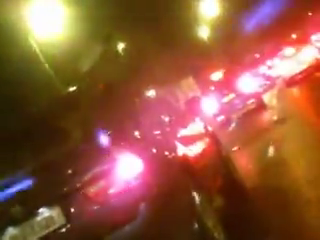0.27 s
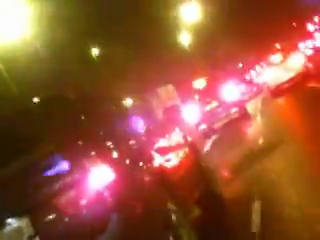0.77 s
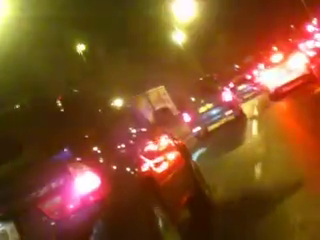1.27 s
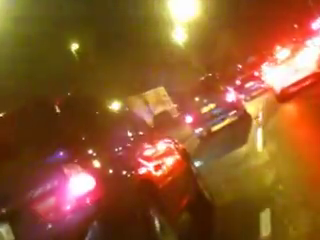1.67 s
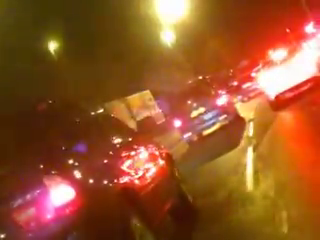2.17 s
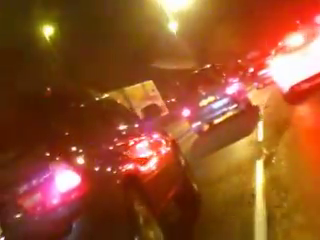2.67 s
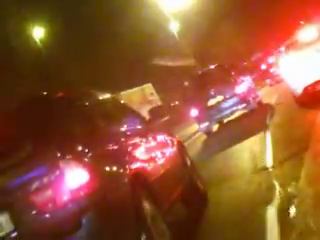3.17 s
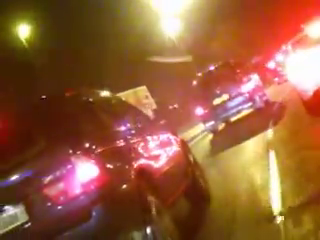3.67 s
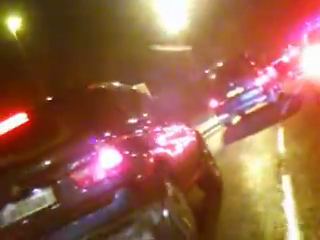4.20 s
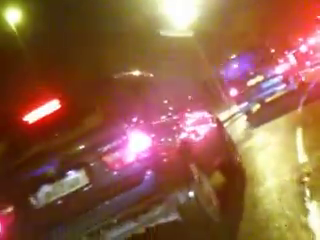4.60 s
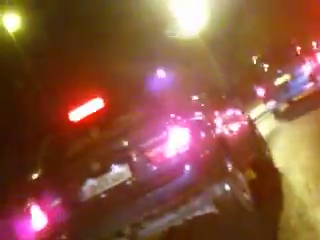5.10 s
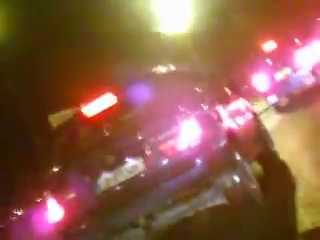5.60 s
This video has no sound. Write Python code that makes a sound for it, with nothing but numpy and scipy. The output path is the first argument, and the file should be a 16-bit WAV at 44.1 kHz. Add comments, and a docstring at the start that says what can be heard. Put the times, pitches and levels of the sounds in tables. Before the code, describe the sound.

A motorcycle rolls along with the throttle nearly closed, heard from a small onboard camera in a hollow housing, so the sound is narrow and boxy. The engine throbs and clatters throughout at a nearly even speed, with a ringing whirr over a low drone. At about 0.5 seconds the mount rattles and loud gusts hit the microphone, overloading it. From 1 second the wind becomes a rapid, thudding flutter with sharp slaps. At about 1.6 seconds it drops away, leaving the much quieter engine, light rattles and a few faint, dull knocks of bodywork between 2 and 4 seconds. Soft pulses of air return just after 4 seconds, followed by a few ringing rattles, the sharpest near 4.7 seconds. From 4.8 seconds heavy, distorted gusts batter the microphone in quick succession until the end, just before 6 seconds.

```python
"""A motorcycle rolls through night traffic, throttle nearly closed, heard by a small camera in a hollow
housing. From the start the engine throbs and clatters through the housing's resonances. Near half a
second the mount rattles and rings them too, while gusts and air pulses at crank rate drive the microphone
hard into overload. After a second and a half the wind drops, leaving the engine, light rattles and dull
knocks of bodywork. The air returns at four seconds and overloads the microphone again to the end."""
import sys
import numpy as np
from scipy import signal
from scipy.fft import rfft, irfft
from scipy.io import wavfile
from scipy.ndimage import uniform_filter1d

SR = 44100
rng = np.random.default_rng(int(sys.argv[2]) if len(sys.argv) > 2 else 0)


def bounce(signal):
    """Save signal as a 16-bit WAV file at the path given by the first command-line argument."""
    frames = np.transpose(np.atleast_2d(signal))
    limited = np.clip(frames, -1, 1)
    pcm = np.round(limited * 32767).astype(np.int16)
    wavfile.write(sys.argv[1], SR, pcm)


N = 257984
T = np.arange(N) / SR

# The colour of an eddy's fine turbulence. Each row: frequency in Hz, level in dB.
TURBULENCE_COLOUR = [(40, -0.5), (200, 12.5), (600, 9), (1100, 0), (1700, 4), (2300, -4.5), (4000, -15)]


def undb(db):
    """Decibels to gain."""
    return 10 ** (np.asarray(db) / 20)


def curve(rows):
    """An automation line through rows of time in seconds and value."""
    return np.interp(T, *np.transpose(rows))


def noise(colour):
    """Noise of rms 1, coloured by rows of frequency in Hz and level in dB."""
    hz, db = np.transpose(colour)
    bins_hz = np.maximum(np.arange(N // 2 + 1) * SR / N, 1)
    gain = undb(np.interp(np.log(bins_hz), np.log(hz), db))
    coloured = irfft(rfft(rng.standard_normal(N)) * gain, N)
    return coloured / coloured.std()


def drift(rate):
    """A modulator of spread 1 that glides to a new random value rate times a second."""
    hold = max(int(SR / rate), 2)
    glide = uniform_filter1d(rng.standard_normal(N)[np.arange(N) // hold], hold)
    return glide / glide.std()


def swells(rows, rise=1):
    """Bell curves. Each row: centre in seconds, gain, half-length in seconds. Rise under 1 hits harder."""
    envelope = np.zeros(N)
    for s, gain, width in rows:
        near = slice(*np.searchsorted(T, [s - 10 * width, s + 10 * width]))
        age = (T[near] - s) / width
        envelope[near] += gain * np.exp(-.5 * np.where(age < 0, age / rise, age) ** 2)
    return envelope


def moments(rate):
    """Sample positions of chance events, about rate a second."""
    at = (np.cumsum(rng.gamma(2, .5, size=600)) / rate * SR).astype(int)
    return at[at < N]


def ring(pitch_hz, wander, rate, flutter_db=3.5):
    """An unevenly driven resonance: a tone whose pitch and level stray rate times a second."""
    cycles = np.cumsum(pitch_hz * (1 + wander * drift(rate))) / SR
    return np.sqrt(2) * np.sin(2 * np.pi * cycles) * undb(flutter_db * drift(rate))


def engine(turns, lag_turns=0.22, firing_depth=.13, crank_depth=.14, warble=.016):
    """A four-stroke single: clatter swells once a turn, more every second turn as it fires over a drone."""
    # The colours of clatter in the housing and of the exhaust drone. Each row: frequency in Hz, level in dB.
    housing_colour = [(300, -52), (600, -29.5), (950, -17.5), (1100, -14), (1225, -4.5), (1350, -15),
                      (1530, 0), (1690, -4), (1860, -14.5), (2020, -7), (2350, -25.5), (2750, -29),
                      (3020, -21), (4200, -36.5)]
    drone_colour = [(25, -6), (60, -21.5), (105, -20.5), (135, -10), (175, -1), (215, 3.5), (270, -11.5),
                    (330, -1.5), (410, -9), (520, -26), (800, -48.5), (2000, -80)]
    # Faders for the clatter, the drone and the exhaust pipe's boom. Each row: time in seconds, level in dB.
    clatter_fader = [(0, -26), (.9, -28), (1.8, -29.5), (3.9, -29), (5.85, -27)]
    drone_fader = [(0, -30), (.4, -29), (.9, -31.5), (3, -32.5), (3.6, -34.5), (5.85, -30.5)]
    boom_fader = [(0, -25.5), (.4, -37.5), (.9, -31), (1.6, -43), (4.1, -48), (4.48, -34.5), (5.85, -46)]
    angle = 2 * np.pi * (turns - lag_turns)
    firing = np.cos(angle / 2)
    throb = 1 + firing_depth * firing + crank_depth * np.cos(angle)
    hiss = undb(-0.8) * noise(housing_colour)
    whine = undb(-4) * ring(pitch_hz=1683, wander=0.031, rate=70)  # the housing's main resonance
    # a swinging delay bends the pitch up and down with each firing
    delay_s = warble * np.cumsum(np.sin(angle / 2)) / SR
    whirr = np.interp(T - delay_s, T, hiss + whine)
    clatter = whirr * throb * undb(curve(clatter_fader) + 1.22 * drift(110))
    drone = noise(drone_colour) * (1 + .12 * firing) * undb(curve(drone_fader) + 1.2 * drift(25))
    boom = ring(pitch_hz=179.2, wander=0.089, rate=73) * undb(curve(boom_fader))
    return clatter + drone + boom


def mount_rattles(chatter_per_s=5.9, chatter_db=-29.5):
    """The mount rattles with a dry rasp and rings the housing; faint chatter fills the gaps."""
    # The mount's rattles. Each row: time in seconds, ring level in dB, half-length in seconds,
    # rasp against the ring in dB.
    hits = [(0.44, -17.5, 0.00082, 9.5), (1.032, -8.5, 0.0025, -9), (1.507, -15.5, .012, -6.5),
            (2.702, -23, 0.012, -3.5), (3.674, -21.5, .008, -17.5), (3.769, -23.5, 0.011, -24),
            (4.407, -25.5, 0.01, 2), (4.501, -16.5, 0.0033, -12), (4.712, -1.5, .0013, -5),
            (4.817, -13, 0.001, -3), (4.9, -24, 0.0069, -7)]
    # The colour of the dry rasp. Each row: frequency in Hz, level in dB.
    rasp_colour = [(200, -10), (700, -9.5), (1300, 2.5), (1900, 2.5), (2500, -15.5), (3200, -7.5),
                   (4200, -26.5)]
    ringing = swells([(s, undb(db), width) for s, db, width, _ in hits])
    ringing += swells([(s, undb(chatter_db), .005) for s in T[moments(chatter_per_s)]])
    rasping = swells([(s, undb(db + rasp_db), width) for s, db, width, rasp_db in hits])
    return ringing * ring(pitch_hz=1688, wander=0.05, rate=500) + rasping * noise(rasp_colour)


def gust_db(layer, calm_db=-46.0, rise_db_per_s=1801.5, fall_db_per_s=1199.5):
    """The fader of one wind layer: each gust rises, holds and falls back to calm."""
    # Gusts on the microphone. Each row: start and end in seconds, then buffet, pulse and eddy levels in dB.
    gusts = [(0, .3, -43, -39.5, -37.5), (0.448, 0.592, 1.5, -20, 3), (0.639, 0.733, -2.5, -33, -23),
             (0.795, 0.836, -23, -18, -31), (1.036, 1.164, -21, 3, -13), (1.184, 1.483, -26, 6.5, -9.5),
             (1.533, 1.567, -3.5, 9.5, -5), (4.086, 4.366, -41, -12, -42), (4.769, 4.902, -23.5, 2, -11),
             (4.926, 5.02, -18, 1, -5), (5.049, 5.162, 0, 1.5, 7.5), (5.189, 5.407, 5, 2.5, 9.5),
             (5.435, 5.589, -24, -3, -7), (5.596, 5.744, 1.5, -0.5, 7), (5.773, 5.833, 2, 11.5, 8)]
    column = ("buffet", "pulses", "eddies").index(layer)
    db = np.full(N, calm_db)
    for start, end, *levels in gusts:
        fade_db = rise_db_per_s * np.maximum(start - T, 0) + fall_db_per_s * np.maximum(T - end, 0)
        db = np.maximum(db, levels[column] - fade_db)
    return db


def air_pulses(turns, push_db=-8, scatter_db=4.0, jitter_s=0.0013, wake_s=0.0025):
    """A sharp suction once a turn and a weaker push half a turn later, each shedding a low wake."""
    # The colour of the churning wake. Each row: frequency in Hz, level in dB.
    wake_colour = [(40, -14), (140, 0), (230, -2.5), (400, -8), (800, -17.5), (3000, -57.5)]
    at = np.flatnonzero(np.diff(np.floor(2 * turns))) + 1
    level_draw, length_draw, time_draw = rng.standard_normal((len(at), 3)).T
    is_push = np.arange(len(at)) % 2 == 0
    when = T[at] + jitter_s * time_draw
    strength = undb(gust_db("pulses")[at] + scatter_db * level_draw + push_db * is_push)
    width = 0.00051 * (1 + 0.32 * strength) * undb(2 * length_draw)  # strong pulses last longer
    pressure = np.where(is_push, strength, -strength)
    pulses = swells(zip(when, pressure, width))
    backflow = swells(zip(when, -0.099 * pressure, 1.2 * width))
    wake_envelope = swells(zip(when + wake_s, 0.38 * np.tanh(strength), np.full(len(at), wake_s)))
    wake = wake_envelope * noise(wake_colour)
    raggedness = 1 + 0.34 * noise(TURBULENCE_COLOUR)
    return pulses * raggedness + backflow + wake


def eddies(turns, scatter_db=4, jitter_s=.002, strays_per_s=22):
    """Cues for the wind: an eddy breaks on each turn's push, strays swarm and the hardest ones slap."""
    # Eddies that slap the microphone. Each row: time in seconds, strength in dB, half-length in seconds.
    slaps = [(0.465, 12, .0026), (.479, 19, 0.0032), (.496, 5, 0.0015), (0.515, 8.5, 0.0026),
             (0.539, 5, 0.00084), (.584, 7, 0.0043), (0.595, 5.5, 0.0039), (.651, 10.5, .0018),
             (0.712, 1.5, 0.0037), (.728, 10, 0.0044), (0.809, -2, 0.0009), (1.055, -0.5, 0.0013),
             (1.247, 15.5, 0.00087), (1.324, 12, 0.0015), (1.363, 3, 0.0019), (1.406, 6.5, 0.00054),
             (1.54, 8.5, 0.001), (1.561, 18, .0011), (4.381, -3.5, 0.0022), (4.728, -3.5, .003),
             (4.862, 3.5, 0.0026), (4.944, 4.5, .0011), (5.07, 22, .0011), (5.192, 9.5, 0.0027),
             (5.208, 14, 0.0022), (5.271, 23, 0.0028), (5.306, 20.5, 0.002), (5.4, 6, 0.0021),
             (5.441, 13.5, 0.002), (5.472, 13, 0.00056), (5.52, 6.5, 0.00093), (5.608, 17, 0.0018),
             (5.623, 11.5, 0.0042), (5.692, 39.5, 0.0014), (5.742, 11, 0.004), (5.774, 12, 0.0012),
             (5.814, 15.5, 0.00097)]
    pushes = np.flatnonzero(np.diff(np.floor(turns + .5))) + 1
    level_draw, length_draw, time_draw = rng.standard_normal((len(pushes), 3)).T
    when = T[pushes] + jitter_s * time_draw
    db = gust_db("eddies")[pushes] + scatter_db * level_draw
    width = 0.00094 * undb(3 * length_draw + 0.39 * np.maximum(db, 0))  # strong eddies last longer
    strays = moments(strays_per_s)
    swarm = [(s, buffet_db - 6, 0.0021) for s, buffet_db in zip(T[strays], gust_db("buffet")[strays])]
    return list(zip(when, db, width)) + swarm + list(slaps)


def wind(cues, lump_db=8, suction_bias=0.21, turbulence_db=-5):
    """Lumpy buffeting leans to suction; each eddy piles up pressure, then breaks with a snap and a hiss."""
    # The colour of the slow buffeting. Each row: frequency in Hz, level in dB.
    buffet_colour = [(8, -10.5), (25, -2), (60, -2), (120, -8.5), (250, -17.5), (600, -31), (1500, -32.5),
                     (4000, -55.5)]
    rumble = noise(buffet_colour) - suction_bias
    buffet = rumble * undb(gust_db("buffet") + lump_db * np.tanh(drift(90)))
    pressure = swells([(s - width, 0.29 * undb(db), 0.0023) for s, db, width in cues])
    # weak eddies are slow and smooth: a dull thump with little turbulence
    bursts = [(s - width / 2, undb(db + min(db, 0) + turbulence_db), width) for s, db, width in cues]
    turbulence = swells(bursts, rise=0.55) * noise(TURBULENCE_COLOUR)
    snaps = swells([(s, -1.11 * undb(db), 0.00026 * (1 + 0.63 / undb(db))) for s, db, _ in cues])
    return buffet + pressure + turbulence + snaps


def bodywork_knocks(trim_db=-6, half_length_s=0.0027):
    """Loose bodywork knocks now and then, light, dull and hollow."""
    # The knocks. Each row: time in seconds, level in dB before the trim.
    hits = [(2.064, -31.5), (3.131, -35.5), (3.512, -33), (3.93, -33)]
    envelope = swells([(s, undb(db + trim_db), half_length_s) for s, db in hits])
    return envelope * ring(pitch_hz=794, wander=0.22, rate=660)


def scene():
    """The mono mix at the microphone; the crank sets the beat for engine, air pulses and eddies."""
    # The crank's speed. Each row: time in seconds, turns per second.
    crank_speed = [(0.0, 22.36), (0.3, 22.1), (0.5, 25.12), (0.8, 23.58), (1.1, 24.7), (1.54, 24.98),
                   (1.8, 22.87), (2.6, 22.67), (3.0, 23.65), (3.4, 22.45), (3.8, 22.44), (4.11, 24.22),
                   (4.5, 25.09), (4.8, 24.08), (5.2, 24.68), (5.5, 23.69), (5.85, 24.51)]
    turns = np.cumsum(curve(crank_speed)) / SR
    mix = engine(turns) + mount_rattles() + air_pulses(turns) + wind(eddies(turns)) + bodywork_knocks()
    return mix[None]


def record(dry, upper_rail=0.47, lower_rail=0.82, knee=5, band_hz=4200, ceiling=.71, top_hz=16000):
    """The preamplifier saturates unevenly; a narrow speech band follows, whose overshoots clip again."""
    rail = np.where(dry > 0, upper_rail, lower_rail)
    saturated = dry / (1 + np.abs(dry / rail) ** knee) ** (1 / knee)
    # the coupling capacitor lets the flat tops sag
    sagging = signal.lfilter(*signal.butter(1, 1.4, "high", fs=SR), saturated)
    speech_band = signal.firwin(281, band_hz, window=("kaiser", 8), fs=SR)
    narrow = signal.fftconvolve(sagging, speech_band[None], "same")
    clipped = np.clip(narrow, -ceiling, ceiling)
    return signal.sosfilt(signal.ellip(8, .2, 70, top_hz, fs=SR, output="sos"), clipped)


dry = scene()
out = record(dry)
bounce(out)
```